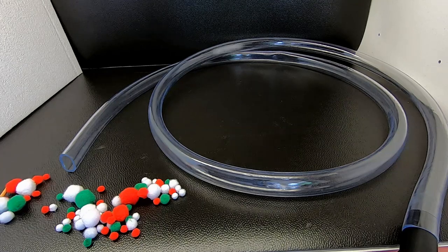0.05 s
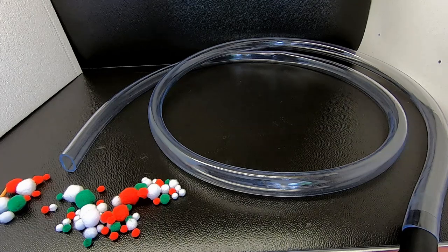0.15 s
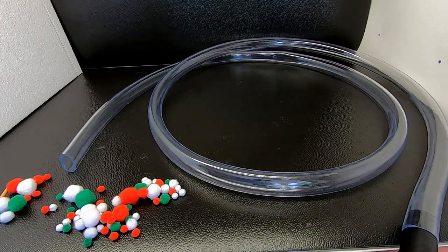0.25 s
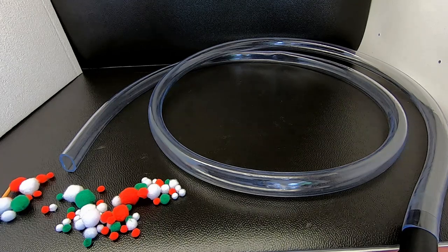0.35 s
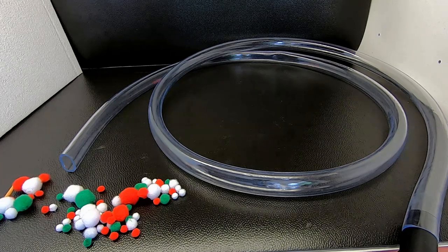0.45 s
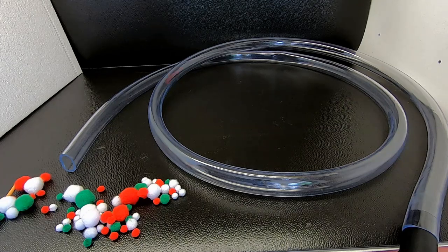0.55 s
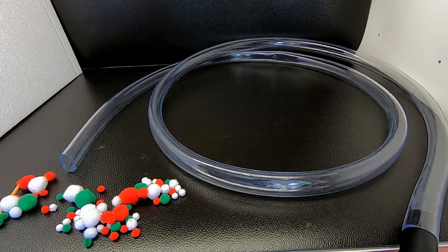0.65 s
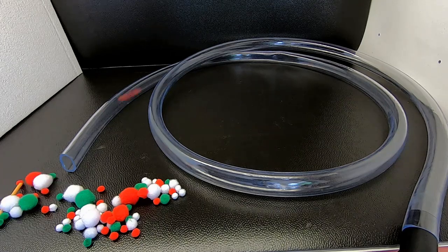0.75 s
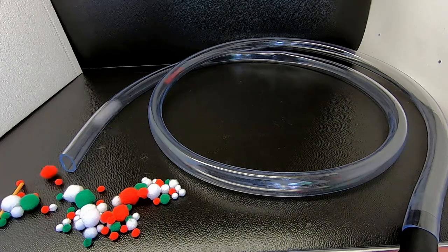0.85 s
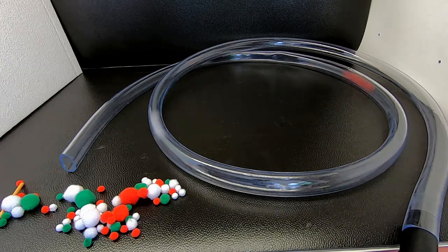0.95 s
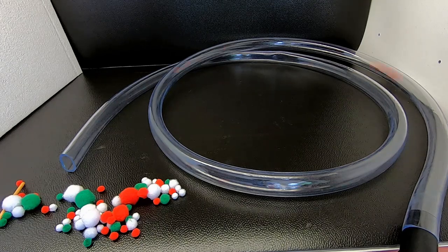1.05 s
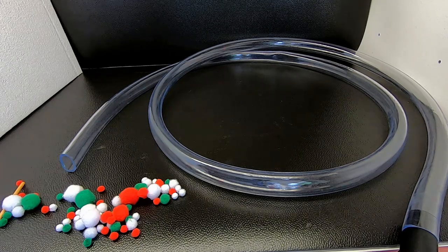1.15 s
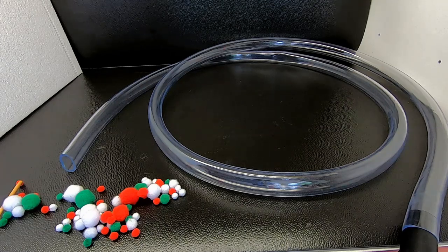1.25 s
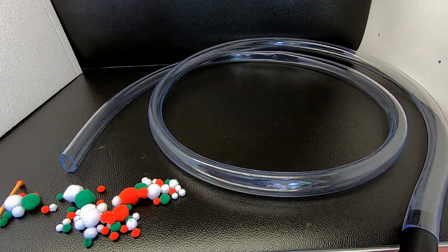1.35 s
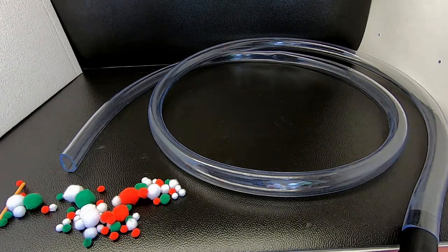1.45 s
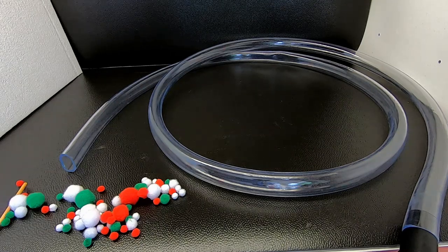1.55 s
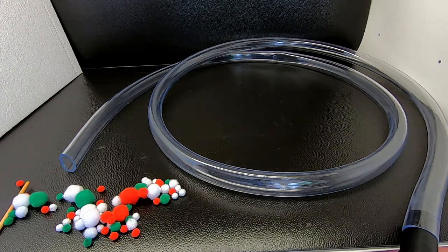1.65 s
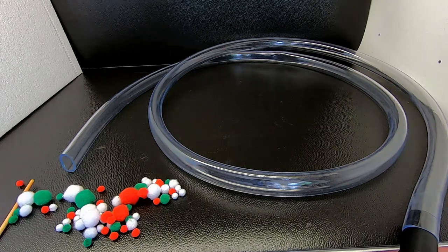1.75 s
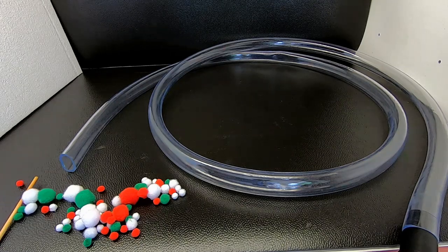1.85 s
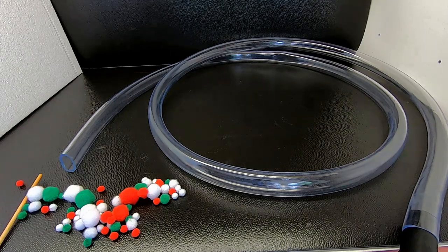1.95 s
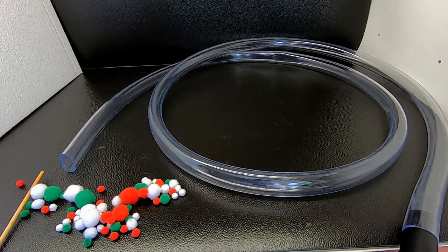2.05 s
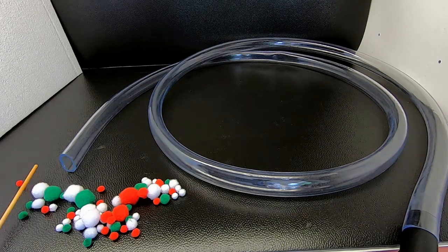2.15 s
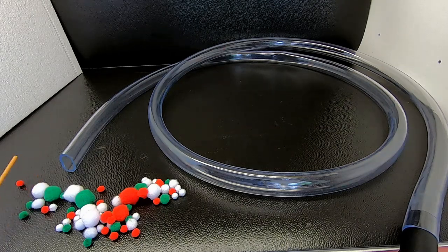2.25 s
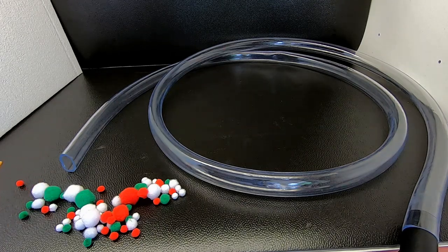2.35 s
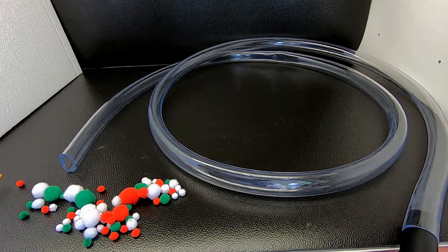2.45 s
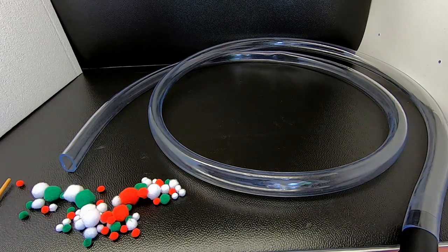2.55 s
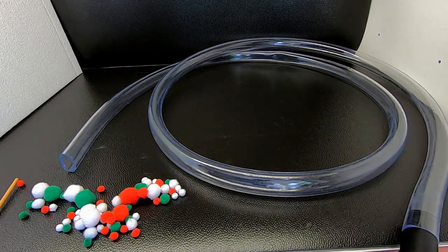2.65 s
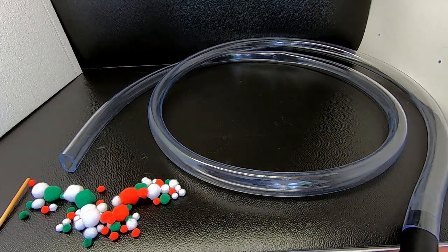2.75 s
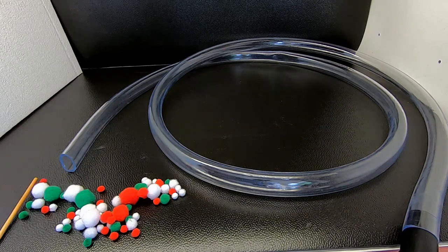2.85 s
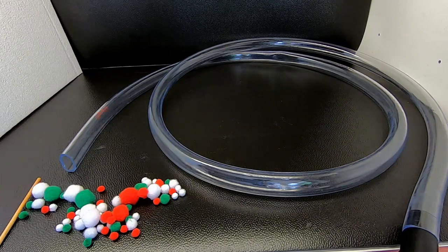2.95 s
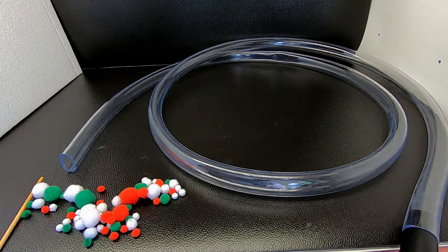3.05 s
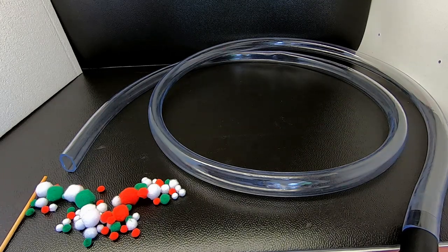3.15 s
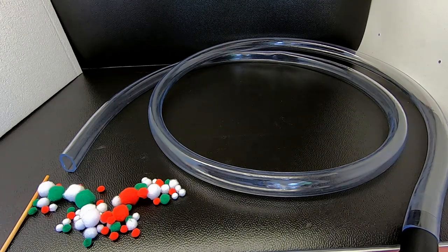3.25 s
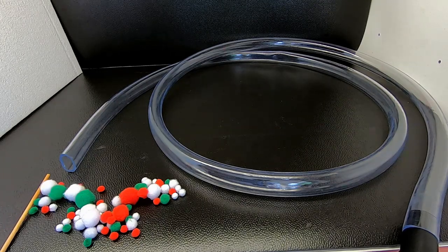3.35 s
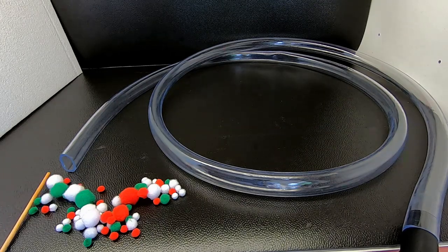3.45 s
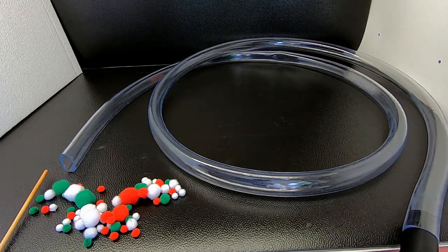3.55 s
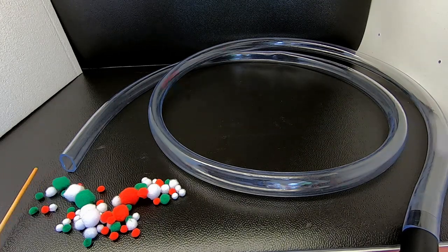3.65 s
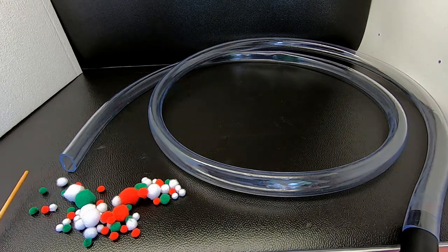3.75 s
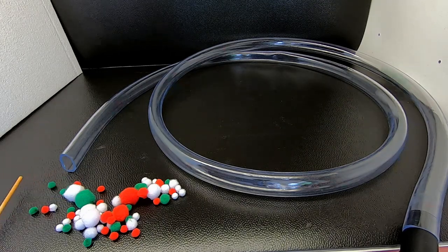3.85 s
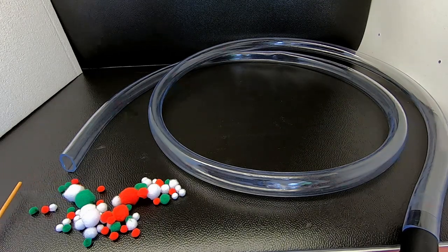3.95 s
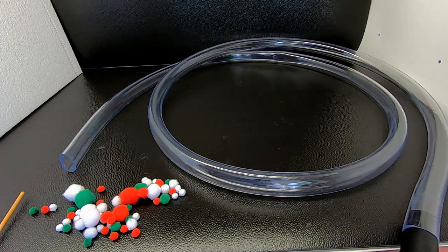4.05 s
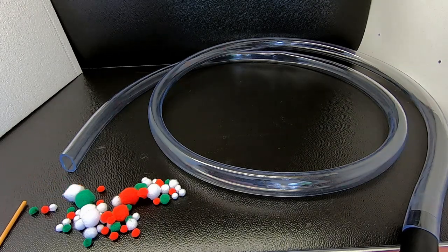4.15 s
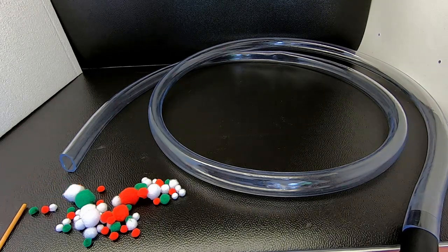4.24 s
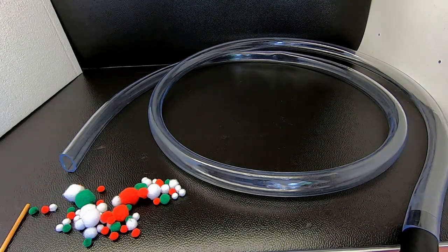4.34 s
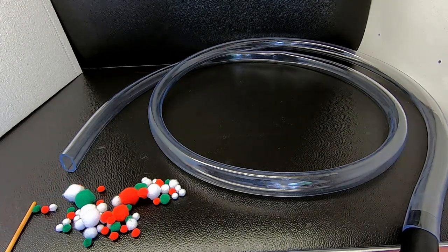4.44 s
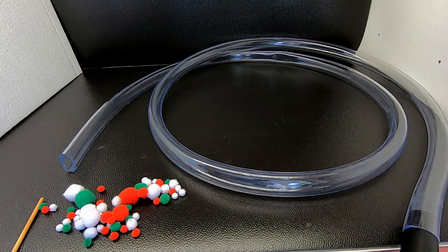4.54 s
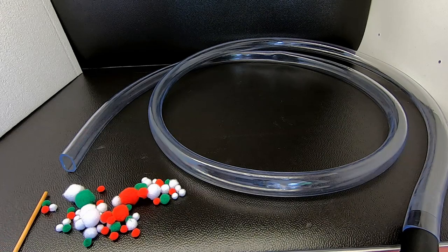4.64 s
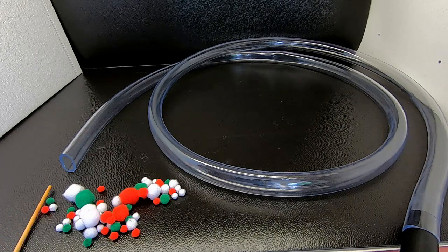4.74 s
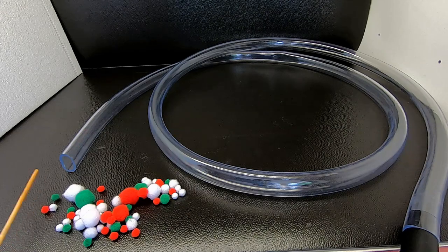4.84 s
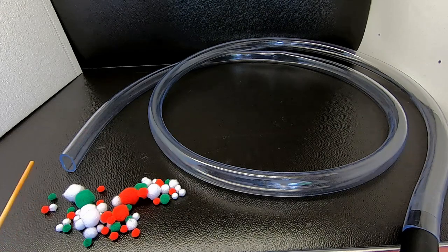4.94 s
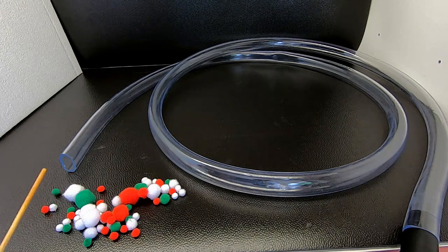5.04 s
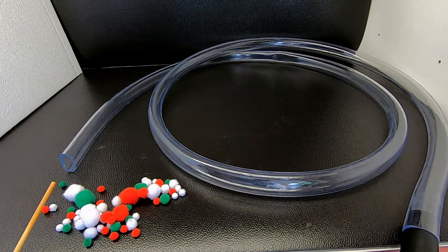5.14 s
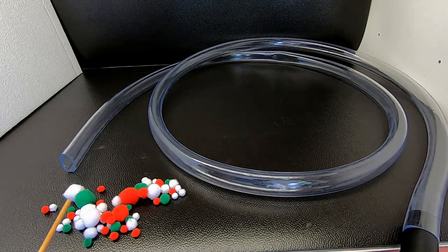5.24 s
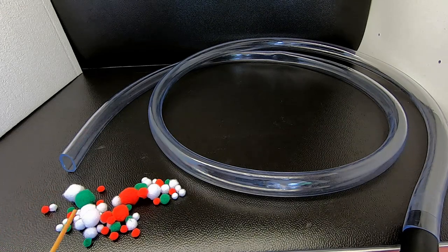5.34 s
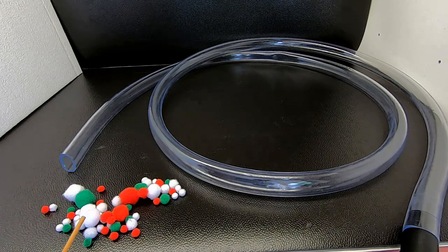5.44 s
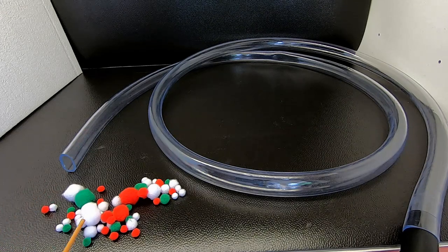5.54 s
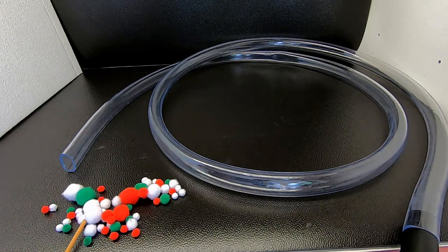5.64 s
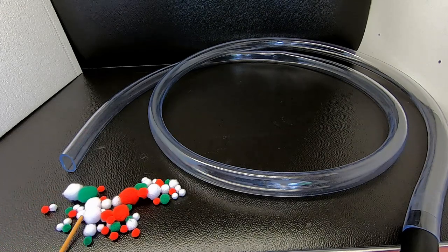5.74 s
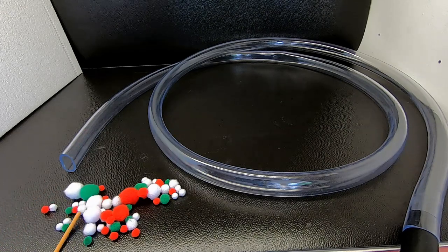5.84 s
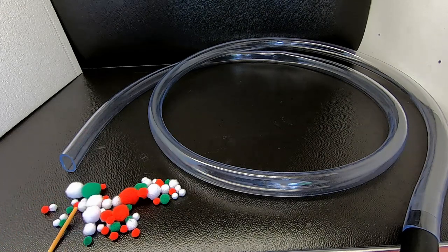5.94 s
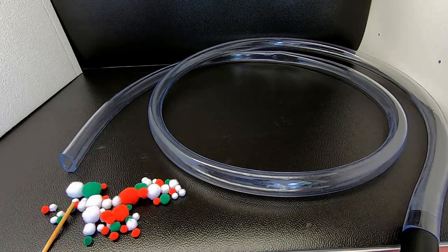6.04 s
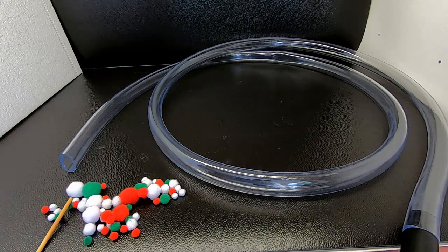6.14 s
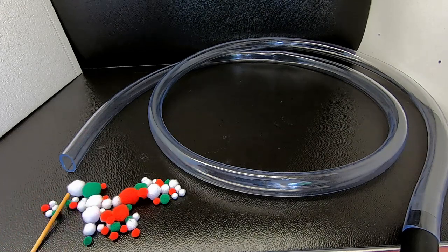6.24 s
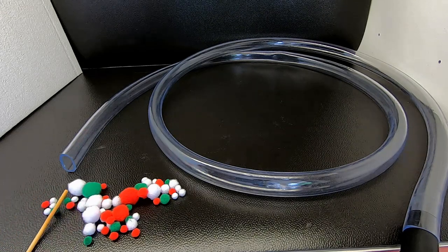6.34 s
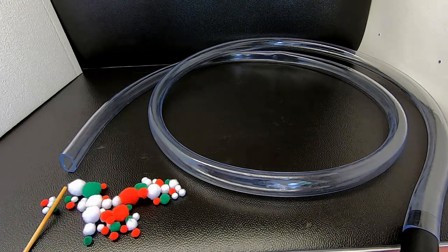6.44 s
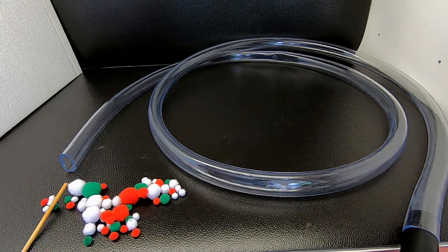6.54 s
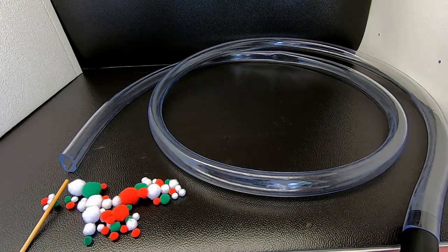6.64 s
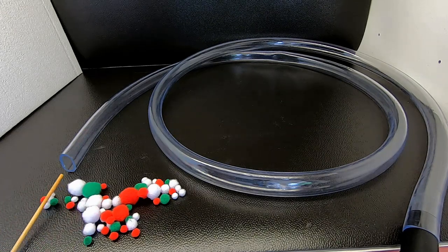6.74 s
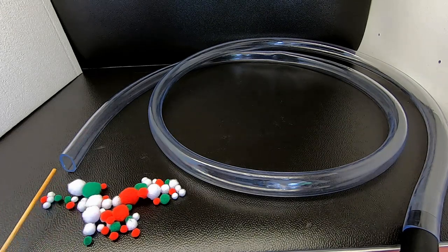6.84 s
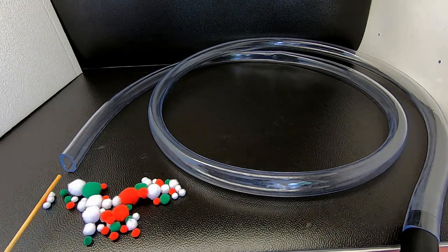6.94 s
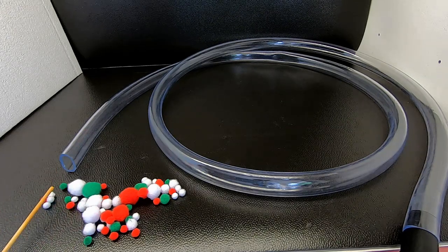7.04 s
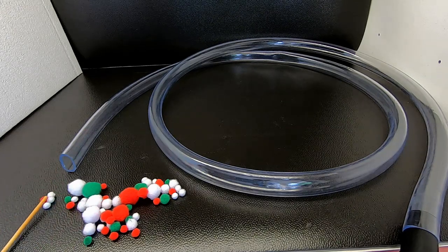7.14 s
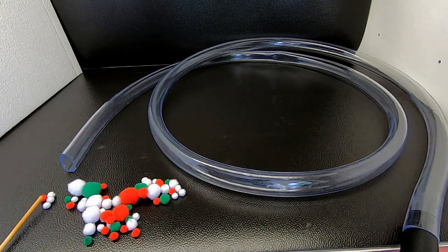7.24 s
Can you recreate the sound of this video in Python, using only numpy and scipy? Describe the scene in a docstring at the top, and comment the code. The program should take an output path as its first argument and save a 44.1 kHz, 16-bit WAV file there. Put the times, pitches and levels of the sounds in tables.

```python
"""A dull thud in the coil, then a loud pop: soft balls ride a long plastic tube with a vacuum cleaner drawing its air.
The tube's mouth lies in a small open box, close to a stereo microphone; each ball that plugs it makes
a suction spike and rings the mouth and the box air. Thuds along the coil are dull rings on the same box modes.
Behind them the motor whines as sines on its shaft orders, over rumble and hiss of spectrally shaped noise.
The recorder's gain control pulls everything down after loud pops."""
import sys
import numpy as np
from scipy import signal
from scipy.io import wavfile
from scipy.ndimage import uniform_filter1d

SR = 44100
rng = np.random.default_rng(int(sys.argv[2]) if len(sys.argv) > 2 else 0)


def waveform_to_disk(signal):
    """Save audio, clipped to [-1, 1], as 16-bit WAV at the path in sys.argv[1]."""
    frames = np.transpose(np.atleast_2d(signal))
    scaled = np.clip(frames, -1, 1) * 32767
    samples = np.round(scaled).astype(np.int16)
    wavfile.write(sys.argv[1], SR, samples)


N = 321489  # samples

# Balls entering the mouth: (time [s], crack level [dB], boom level [dB])
MOUTH_POPS = [(0.1572, -8.5, -5.5), (0.675, -22, -19), (.779, -32, -29), (0.9765, -22, -17),
              (1.053, -25, -27), (1.0828, -2.5, 1.5), (1.135, -9.5, -2.5), (1.181, -28, -34),
              (3.1967, -20.5, -27), (3.7226, -6.5, -2), (3.7792, -23.5, -17), (3.9345, -8, -3.5),
              (4.024, -15.5, -16.5), (4.1664, -22, -26), (4.2741, -20.5, -23), (4.2935, -25, -23.5),
              (5.4267, -22, -22.5)]
# Dull thuds of balls in the coil: (time [s], level [dB])
COIL_THUDS = [(0.023, -19), (.889, -15), (0.932, -19), (0.947, -24.5), (1.515, -19), (3.483, -22),
              (3.5422, -16), (3.592, -19)]
# Air modes of the box: (frequency [Hz], relative level [dB], decay by 60 dB [s], sign at the microphone)
BOX_MODES = [(70, -18, .3, 1), (106, 0, .16, 1), (128, -16, .2, -1), (151, -15, .25, -1),
             (171, -11, .2, -1), (232, -19, .1, -1), (306, -15, .16, 1), (375, -14, .05, 1),
             (550, -9.5, .05, 1)]
# Short rings of the mouth: (frequency [Hz], left level [dB], right level [dB], decay by 60 dB [s])
MOUTH_RINGS = [(800, -63, -45, 0.01), (1030, -24, -15.5, 0.025), (1174, 14.5, -22, 0.029),
               (1466, 11.5, 5.5, 0.015), (1960, -31.5, -18, 0.032), (2310, 8, -3, 0.02)]
# Direct sound and echoes off the box walls: (delay [ms], level [dB])
WALL_ECHOES = [(0, 5), (.9, -36), (2.1, 2), (4, -28), (7.05, -2.5)]
# Shaft orders of the motor: (multiple of the shaft rate)
SHAFT_ORDERS = [1, 2, 12, 16]
# One row for each order, before its wavering: (left level [dB], right level [dB], left lead [rad])
ORDER_LEVELS = [(-49.5, -49.5, 0), (-53, -55, 0.9), (-48.5, -54, 2), (-56, -55.5, 4)]
# Shaft rate; the motor races a little while balls choke the air: (time [s], rate [turns/s])
SHAFT_RATE = [(0.9, 492.92), (1.25, 493.62), (1.9, 492.78), (2.45, 492.45), (3.2, 492.72), (4.1, 493.8),
              (4.8, 493.35), (5.6, 492.98), (7.1, 492.7)]
# Level change of the high whine: (time [s], level [dB])
WHINE_LEVEL = [(0, -6), (1.4, -2), (2.3, -1.5), (2.9, 0), (3.3, -3.5), (4.0, 2.5), (5.2, 2.5), (6.0, -3),
               (7.29, -7)]
# Groups of balls in the coil that swell the rumble: (middle [s], half length [s], swell [dB])
BALL_GROUPS = [(0.05, 0.53, 1.5), (1.003, 0.18, 6.5), (2.65, .3, 1.5), (3.75, 0.38, 4)]
# Relative spectrum of the rumble: (frequency [Hz], density [dB per Hz])
RUMBLE_SPECTRUM = [(8.8, -46), (15, -10), (35, -5), (76, -9), (108, 2), (140, -10), (193, -18),
                   (235, -16.5), (267, -24), (368, -16.5), (461, -16.5), (499, -17), (568, -19.5),
                   (636, -45.5), (700, -29), (910, -38), (1540, -120)]
# Relative spectrum of the hiss: (frequency [Hz], density [dB per Hz])
HISS_SPECTRUM = [(600, -7.5), (634, -23), (830, -8.5), (1100, -8.5), (1550, -7), (2100, -5.5), (2500, -4.5),
                 (3400, -9.5), (3900, -15), (4700, -16.5), (6000, -15), (9700, -18), (11000, -28.5),
                 (14000, -38), (15500, -47)]
# Resonances and notches of the air path: (frequency [Hz], width [Hz], gain [dB])
AIR_PATH = [(30.2, 5.1, 3.5), (60.6, 15.5, 6), (85, 17, -2.5), (212, 8.3, -13.5), (298.2, 10, 11),
            (477, 37, -12), (840, 60, -0.5), (890, 30, -9.5), (995, 84, 6), (1034, 41, -6.5),
            (1387, 26, 7.5), (1537, 140, 3.5), (1836, 28, 14), (1860, 137, -6), (2152, 20.4, 11.5),
            (2444, 22, 5), (2472, 33, 8.5), (2618, 36, 5), (2667, 50, 3)]
# Likeness of the flow noise at the two microphone ports: (frequency [Hz], likeness [0 to 1])
PORT_LIKENESS = [(60, 1), (300, 1), (600, 0.89), (800, 0.61), (1100, 0.37), (1400, .6), (2000, 0.53),
                 (2300, 0.61), (3500, 0.72), (5000, 0.23), (6000, 0.026), (15000, 0.041)]
# Phase lead of the left port for the flow noise: (frequency [Hz], lead [rad])
LEFT_LEAD = [(500, 0.0099), (1000, 0.11), (1150, -1.3), (1500, -0.3), (2100, -1.1), (2500, -0.03),
             (3000, -1.15), (3700, -0.026)]
# Balance of the flow noise: (frequency [Hz], left over right [dB])
LEFT_OVER_RIGHT = [(150, -0.5), (340, 3), (520, -1), (800, 0.5), (950, -7.5), (1120, 6.5), (1700, -3.5),
                   (2000, 1.5), (2800, -4), (3500, 1), (5000, -1.5), (8800, -3), (10000, 0.5), (15000, 1.5)]
# A brief dip in level: (time [s], recovery [s], depth [dB])
BRIEF_DIP = (3.882, .005, -13)

RUMBLE_DB, HISS_DB = -28.5, -35.5  # rms of each flow noise ahead of the recorder
FLUTTER_DB = -10.5  # flutter as the ball lifts off, against its crack
CEILING = 0.6  # amplitude limit of the soft overload
EDGE_HZ = 15600  # upper edge of the recorded band


def balls():
    """Each ball flutters at the rim, plugs the mouth with a suction spike and sets the box air ringing."""
    pop_s, crack_db, boom_db = np.transpose(MOUTH_POPS)
    thud_s, thud_db = np.transpose(COIL_THUDS)
    t = np.arange(SR // 3) / SR
    crack, boom = mouth_crack(t), box_boom(t)
    flutter = -np.sin(2 * np.pi * 750 * t) * np.exp(-((t - 0.0014) / 0.0016) ** 2)

    surge_envelope = amp(-20 - 60 * t / 0.3) * np.minimum(t / 0.0045, 1)
    surge = struck(pop_s, boom_db, surge_envelope) * band_noise(140, 445)[0]
    low = struck(pop_s - 0.0006, boom_db, boom)
    low = low + struck(pop_s - 0.0068, crack_db + FLUTTER_DB, flutter)
    low = low + surge + struck(thud_s, thud_db, coil_thud(t))
    out = np.repeat(soften(low, 2000), 2, axis=0)  # the same at both ports

    # fluff makes no sharp edge, and small loose balls seal the mouth more softly
    scatter_envelope = amp(-13.5 - 60 * t / 0.099) * np.minimum(t / 0.0017, 1)
    for group, edge_hz in [(crack_db > -14, 2900), (crack_db <= -14, 1900)]:
        scatter = struck(pop_s[group], crack_db[group], scatter_envelope) * band_noise(760, 1800)
        cracks = struck(pop_s[group] - 0.001, crack_db[group], crack)
        out += soften(cracks + scatter, edge_hz)
    return out


def mouth_crack(t):
    """The suction spike as the mouth is plugged, its echoes off the box walls, and the mouth's short rings."""
    spike = -np.exp(-((t[:90] - 0.001) / 0.00021) ** 2) * amp([[2.5], [-2.5]])  # stronger on the left
    walls = np.zeros((1, len(t) - 89))
    for ms, db in WALL_ECHOES:
        walls[0, round(ms * SR / 1000)] = amp(db)
    rings = np.zeros((2, len(t)))
    for hz, left_db, right_db, t60 in MOUTH_RINGS:
        rings -= ring(t - 0.001, hz, np.array([[left_db], [right_db]]), t60)
    rings *= t > 0.001  # they start at the peak of the spike
    return signal.fftconvolve(spike, walls, axes=1) + amp(-17) * rings


def box_boom(t):
    """The box air rings on its modes, with one pulse as the stopped air piles up before the mouth."""
    modes = sum(sign * ring(t, hz, db, t60) for hz, db, t60, sign in BOX_MODES)
    rebound = amp(-6) * np.exp(-((t - 0.0021) / 0.0007) ** 2)
    return modes * np.minimum(t / 0.001, 1) + rebound


def coil_thud(t):
    """A dull ring on the box modes, inverted and tilted down by 5 dB per octave."""
    modes = sum(sign * ring(t, hz, db - 5 * np.log2(hz / 106), t60) for hz, db, t60, sign in BOX_MODES)
    return -modes * np.minimum(t / 0.0017, 1)


def ring(t, hz, db, t60):
    """A mode released by a sudden step in pressure: a cosine that decays exponentially."""
    return amp(db - 60 * t / t60) * np.cos(2 * np.pi * hz * t)


def struck(times, dbs, sound):
    """Plays one sound at every time with its own level."""
    train = np.zeros(N)
    places = np.round(np.asarray(times) * SR).astype(int)
    np.add.at(train, np.clip(places, 0, N - 1), amp(dbs))
    return signal.oaconvolve(train[None], np.atleast_2d(sound), axes=1)[:, :N]


def band_noise(lo_hz, hi_hz):
    """Band-passed noise of rms 1, partly shared between the two ports."""
    band = signal.butter(2, [lo_hz, hi_hz], "band", fs=SR, output="sos")
    noise = signal.sosfilt(band, rng.standard_normal((2, N)))
    return evened(noise + 0.44 * noise[::-1])


def soften(x, hz):
    """Takes off the treble above hz with a low-pass run both ways, so that nothing is delayed."""
    return signal.sosfiltfilt(signal.butter(6, hz, fs=SR, output="sos"), x)


def motor():
    """Shaft orders as clean lines that follow the shaft rate, each wavering in strength at each port."""
    t = np.arange(N) / SR
    coarse = t[::400]
    turns = np.cumsum(np.interp(t, *np.transpose(SHAFT_RATE))) / SR
    whine_db = np.interp(t, *np.transpose(WHINE_LEVEL))
    out = np.zeros((2, N))
    for order, (left_db, right_db, lead) in zip(SHAFT_ORDERS, ORDER_LEVELS):
        waver_db = np.array([1.43 * np.interp(t, coarse, drift(coarse, 30)) for port in range(2)])
        if order > 10:
            waver_db = waver_db + whine_db
        phase = 2 * np.pi * (order * turns + rng.random()) + np.array([[lead], [0]])
        level_db = np.array([[left_db], [right_db]]) + waver_db
        out += np.sqrt(2) * amp(level_db) * np.sin(phase)  # levels are rms
    return out


def air(spectrum, db, swells, patchy_db, flicker_db):
    """Turbulent noise coloured by the air path, partly shared by two microphone ports."""
    size, hop = 4096, 1024  # samples per spectral frame and between frames
    frames, hz = N // hop + 5, np.fft.rfftfreq(size, 1 / SR)
    a, b, c, d, patches = rng.standard_normal((frames, len(hz), 5)).T
    # patches of strength, smoothed across frequency and then time
    patches = evened(uniform_filter1d(uniform_filter1d(patches, 6, 0), 10, 1))
    t = np.arange(frames) * hop / SR
    level_db = swells * traffic_db(t) + flicker_db * drift(t, 25)

    colour_db = read(spectrum, hz)
    for f, width, gain_db in AIR_PATH:
        colour_db = colour_db + gain_db / (1 + (2 * (hz - f) / width) ** 2)
    colour_db[(hz < spectrum[0][0]) | (hz > spectrum[-1][0])] = -200  # silent outside the table

    same = np.clip(read(PORT_LIKENESS, hz), 0, 1)[:, None]
    left, own = a + 1j * b, c + 1j * d
    right = same * left * np.exp(-1j * read(LEFT_LEAD, hz))[:, None] + np.sqrt(1 - same ** 2) * own
    side_db = read(LEFT_OVER_RIGHT, hz)[:, None] / 2
    ports = np.array([left * amp(side_db), right / amp(side_db)])
    ports = ports * amp(colour_db[:, None] + patchy_db * patches + level_db)
    noise = signal.istft(ports, nperseg=size, noverlap=size - hop)[1][:, :N]
    return amp(db) * evened(noise)


def traffic_db(t):
    """Swell of the rumble while groups of balls pass."""
    return sum(db * np.exp(-((t - middle) / half) ** 2) for middle, half, db in BALL_GROUPS)


def drift(t, top_hz):
    """Slow chance wavering of rms 1: sines of random phase, weaker toward top_hz."""
    rates_hz = np.geomspace(1.5, top_hz, 24)
    return evened(sum(np.sin(2 * np.pi * (f * t + rng.random())) / np.sqrt(f) for f in rates_hz))


def read(points, hz):
    """Reads a table between its points on a logarithmic frequency axis."""
    f, value = np.transpose(points)
    return np.interp(np.log(hz + 1), np.log(f + 1), value)


def amp(db):
    """Amplitude ratio of a level in dB."""
    return 10 ** (np.asarray(db) / 20)


def evened(x):
    """Scales a signal to rms 1 over all its channels."""
    return x / np.sqrt(np.mean(x ** 2) + 1e-20)


def scene():
    """Balls at the mouth and in the coil, in front of motor, rumble and hiss."""
    rumble = air(RUMBLE_SPECTRUM, RUMBLE_DB, swells=True, patchy_db=0.4, flicker_db=0.3)
    hiss = air(HISS_SPECTRUM, HISS_DB, swells=False, patchy_db=1.5, flicker_db=0.22)
    return balls() + motor() + rumble + hiss


def record(dry):
    """Gain control with three recovery speeds, a brief dip, soft overload and the band limit."""
    t = np.arange(N) / SR
    power_db = 10 * np.log10(abs(uniform_filter1d((dry ** 2).mean(0), 300)) + 1e-12)
    cut_db = np.zeros(N)
    # (threshold [dB], cut per dB above it, recovery of the held level [dB/s]): quick, slow, very slow
    for threshold_db, slope, db_per_s in [(-14.5, 0.36, 300), (-19.5, 0.13, 17.5), (-22.5, 0.075, 7.6)]:
        # the held level jumps up with the sound and falls back at a steady rate
        held_db = np.maximum.accumulate(power_db + db_per_s * t) - db_per_s * t
        cut_db += slope * np.maximum(held_db - threshold_db, 0)
    dip_s, recovery_s, depth_db = BRIEF_DIP
    dip_db = depth_db * np.exp(-abs(t - dip_s) / np.where(t > dip_s, recovery_s, 0.0015))
    out = dry * amp(dip_db - uniform_filter1d(cut_db, 100))
    out = out / (1 + (abs(out) / CEILING) ** 4) ** 0.25
    band_limit = signal.firwin(511, EDGE_HZ, window=("kaiser", 9), fs=SR)
    return signal.oaconvolve(out, band_limit[None], "same")


dry = scene()
out = record(dry)
waveform_to_disk(out)
```